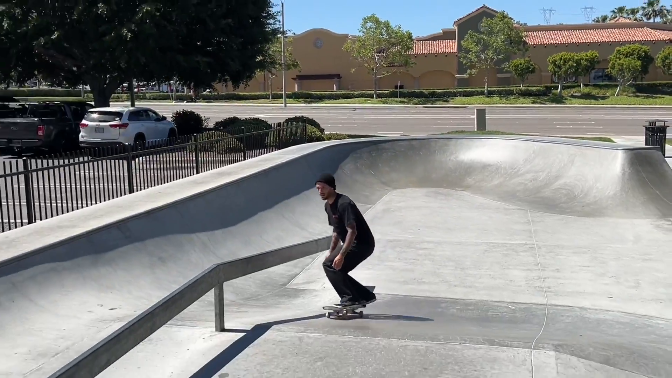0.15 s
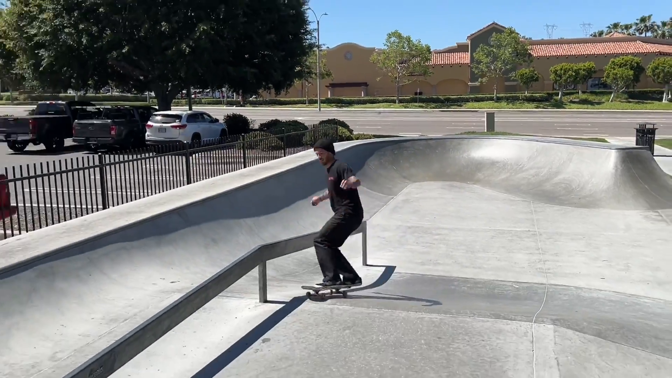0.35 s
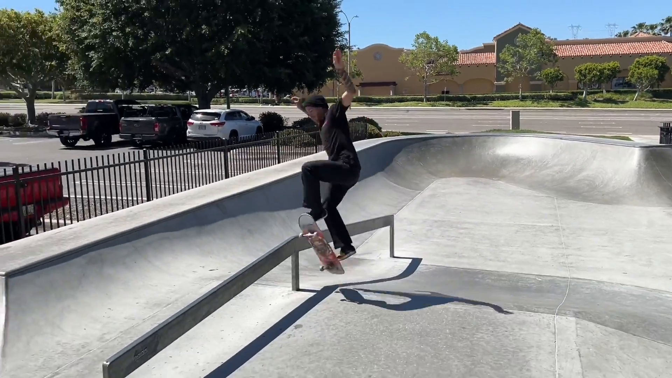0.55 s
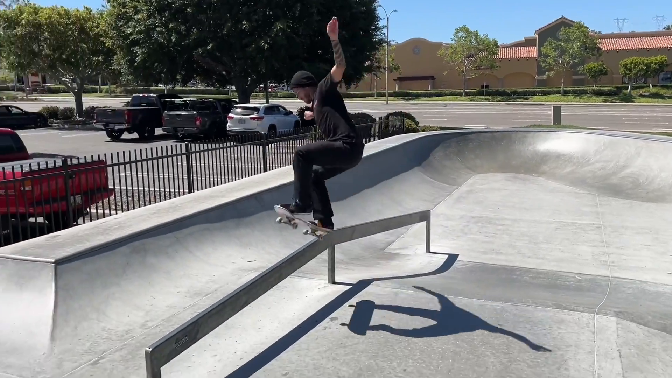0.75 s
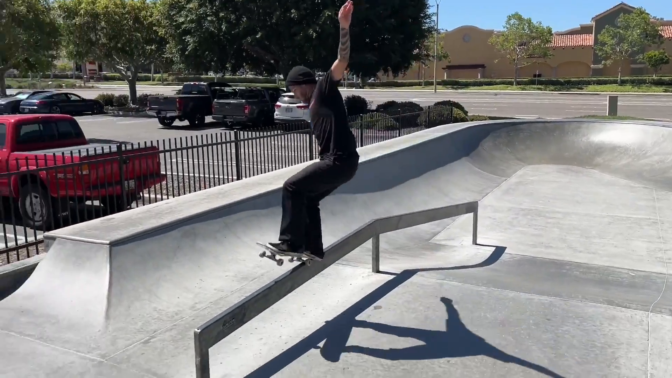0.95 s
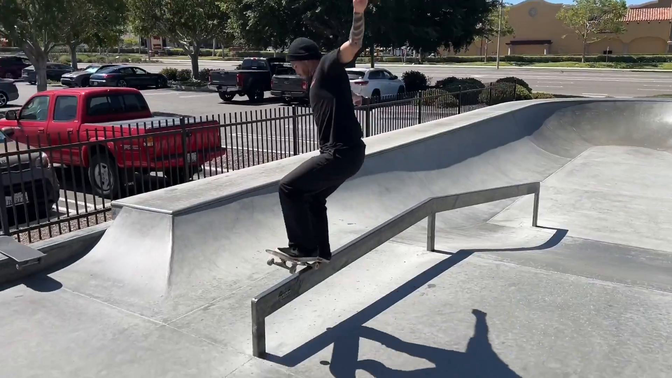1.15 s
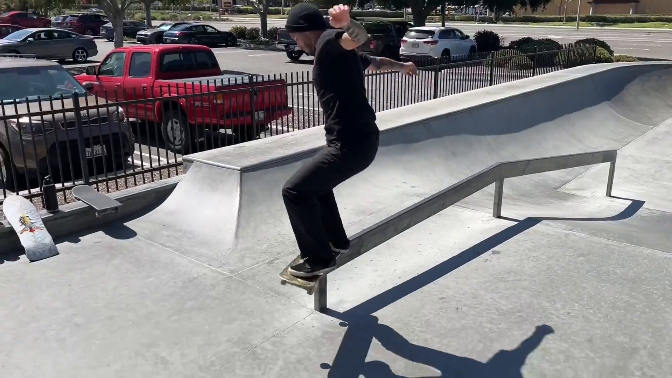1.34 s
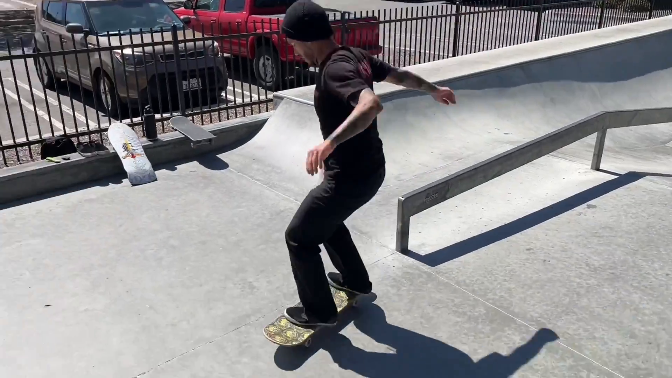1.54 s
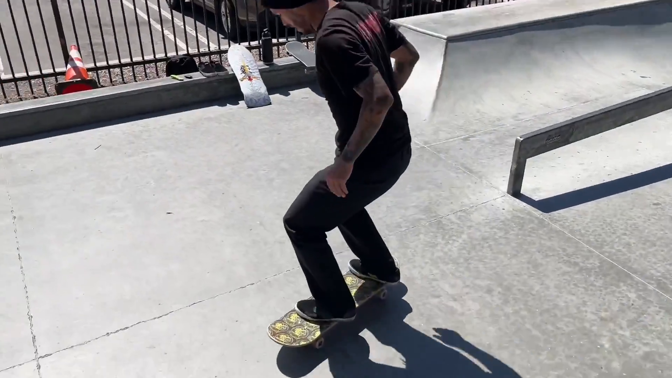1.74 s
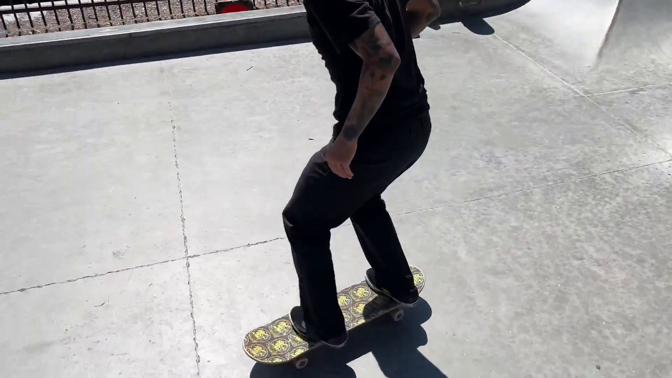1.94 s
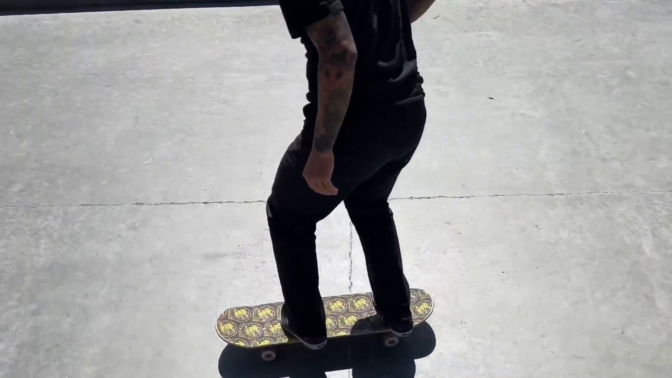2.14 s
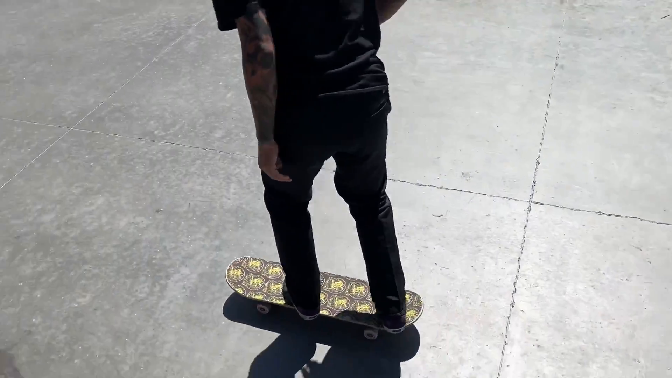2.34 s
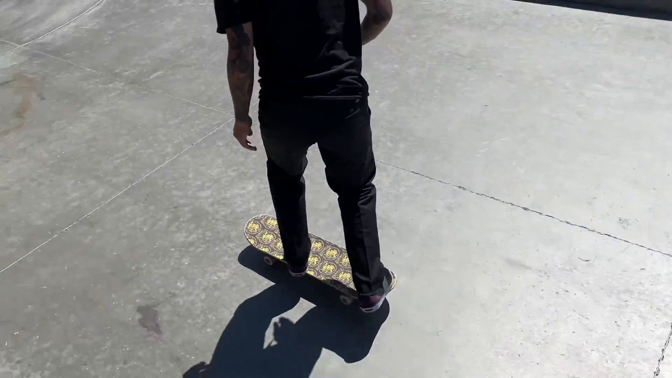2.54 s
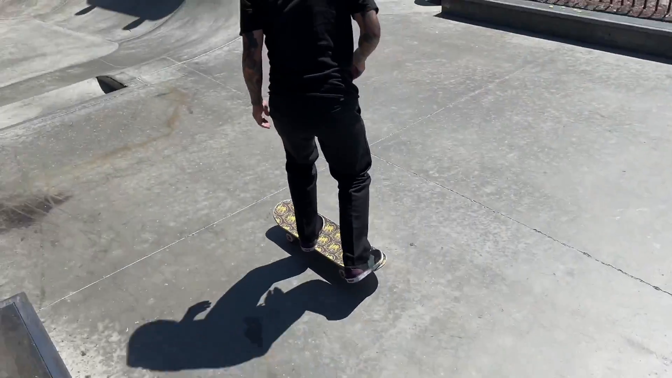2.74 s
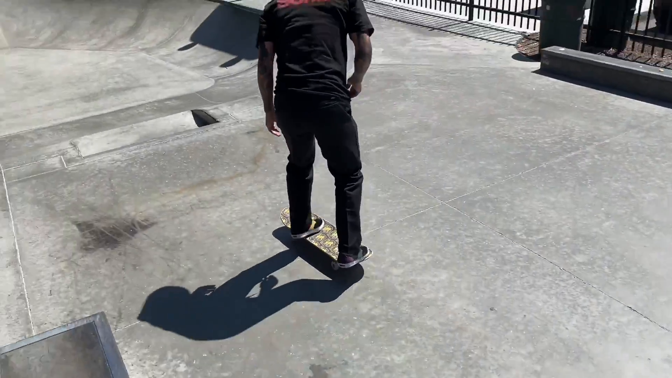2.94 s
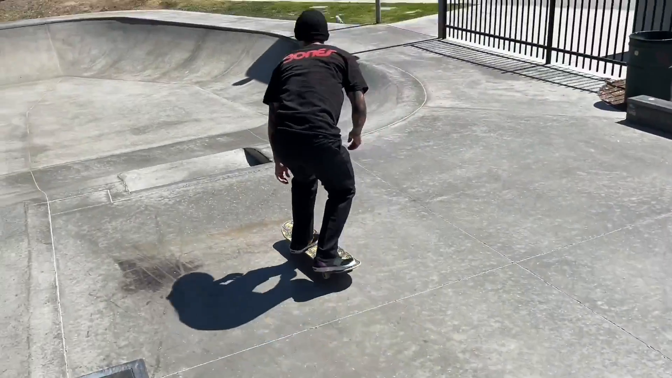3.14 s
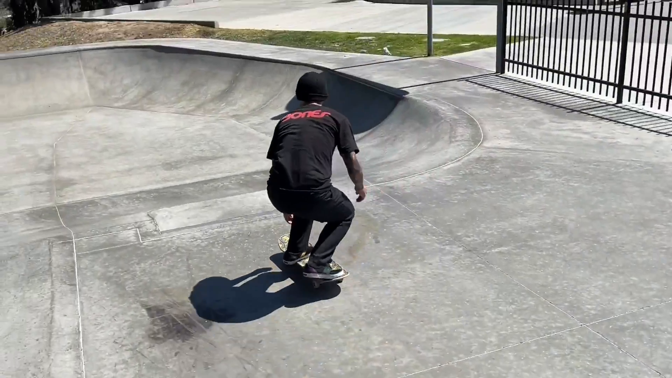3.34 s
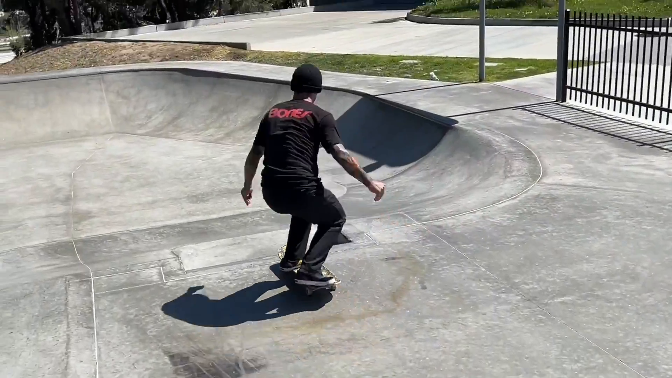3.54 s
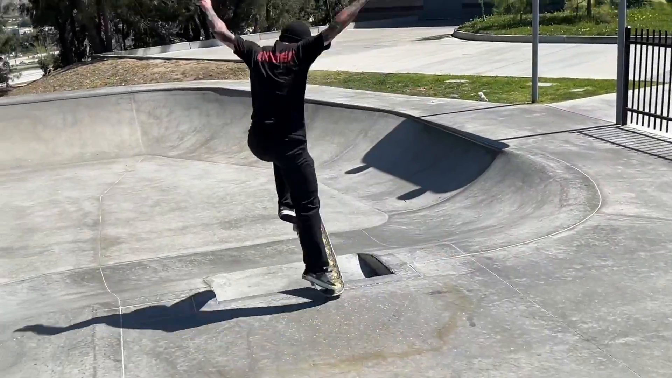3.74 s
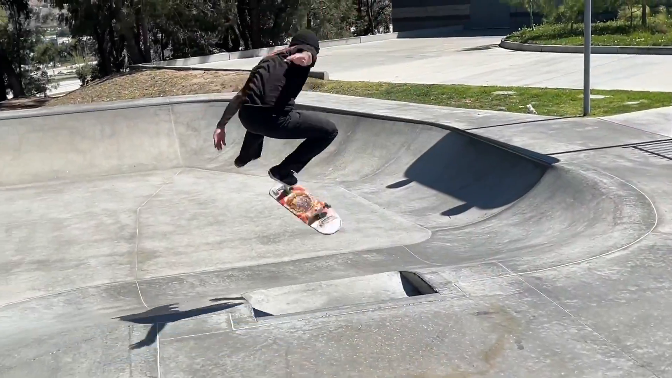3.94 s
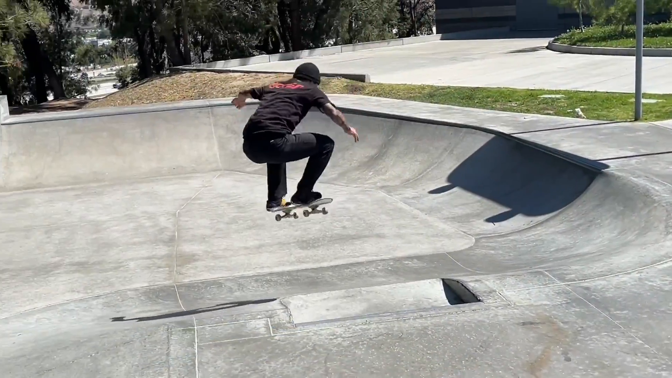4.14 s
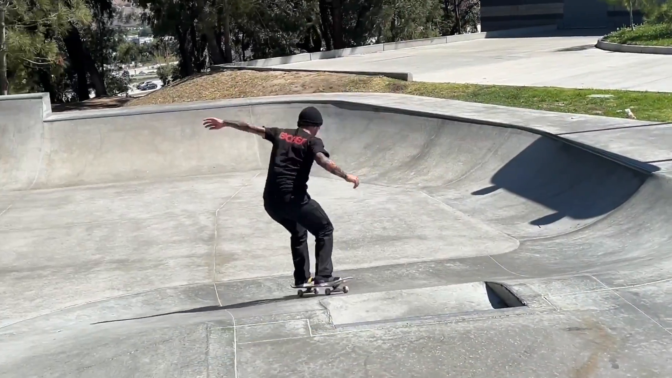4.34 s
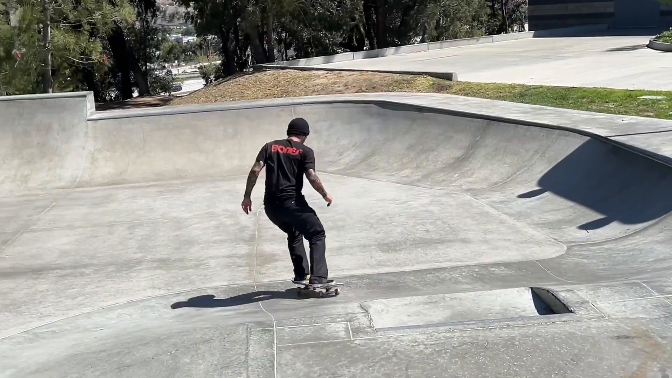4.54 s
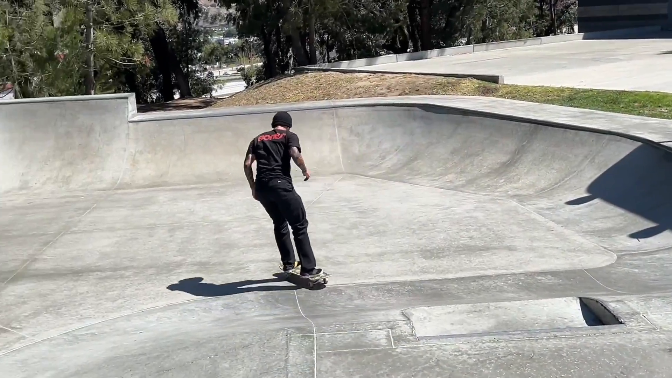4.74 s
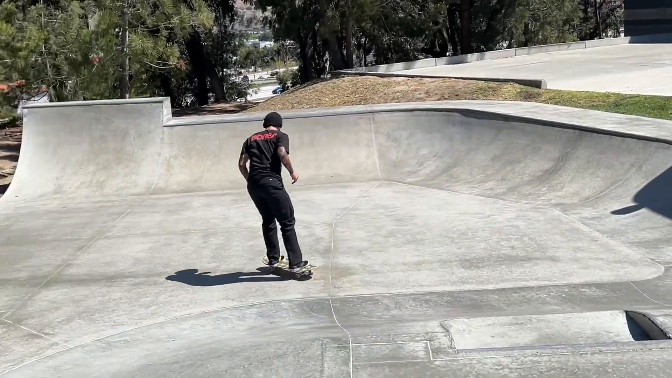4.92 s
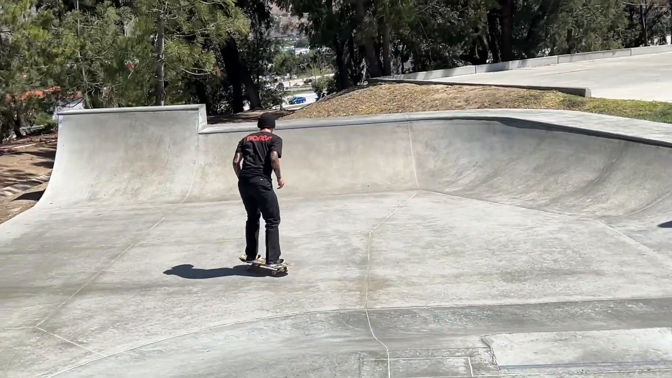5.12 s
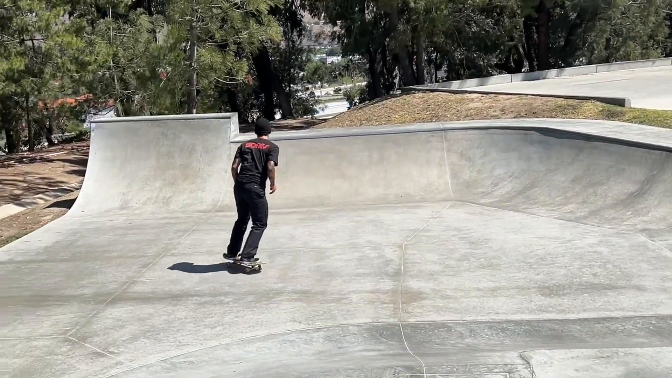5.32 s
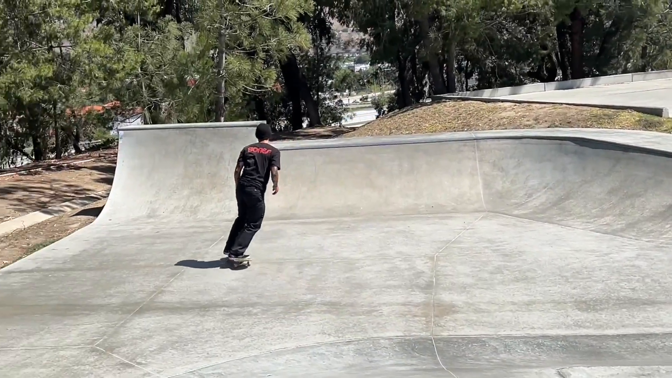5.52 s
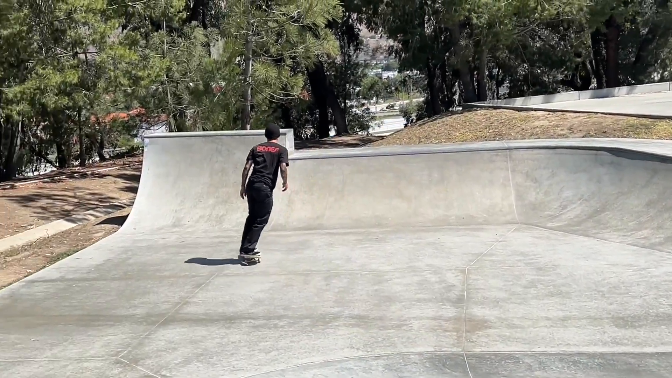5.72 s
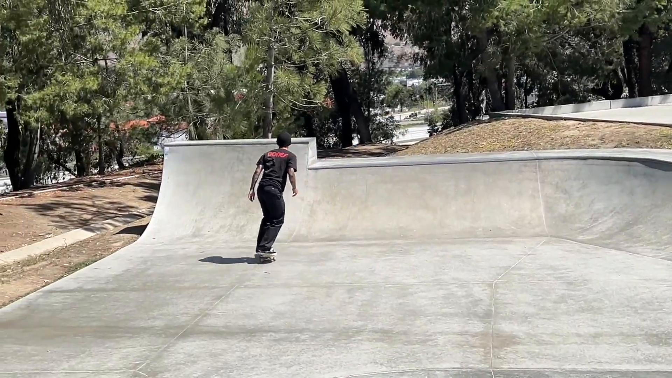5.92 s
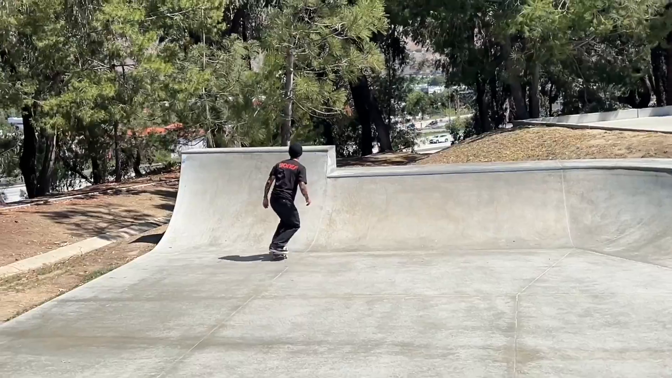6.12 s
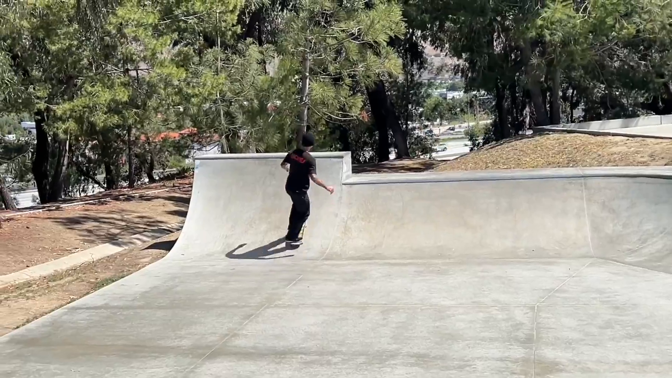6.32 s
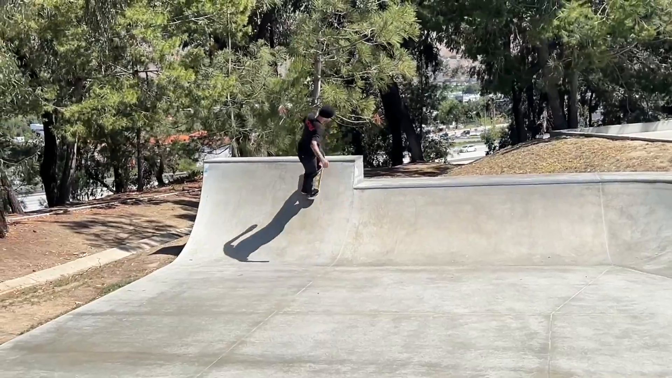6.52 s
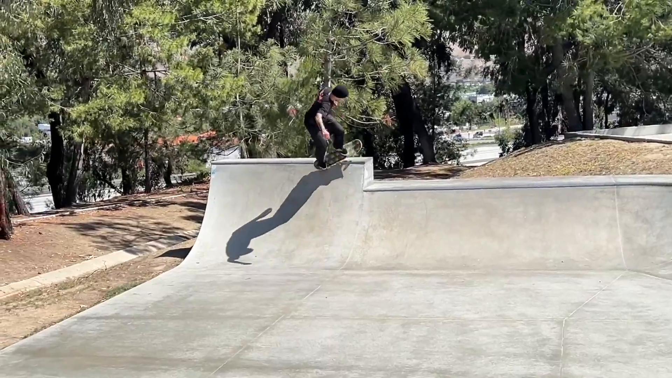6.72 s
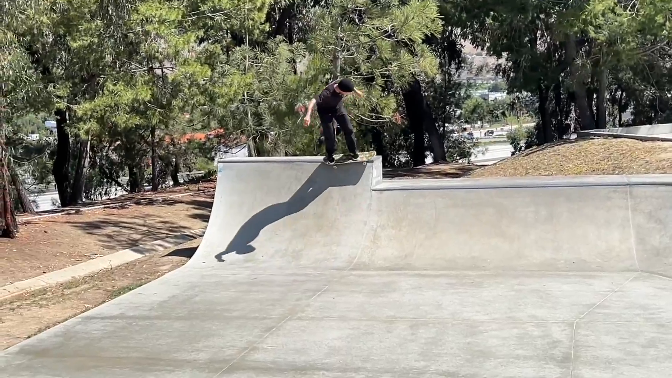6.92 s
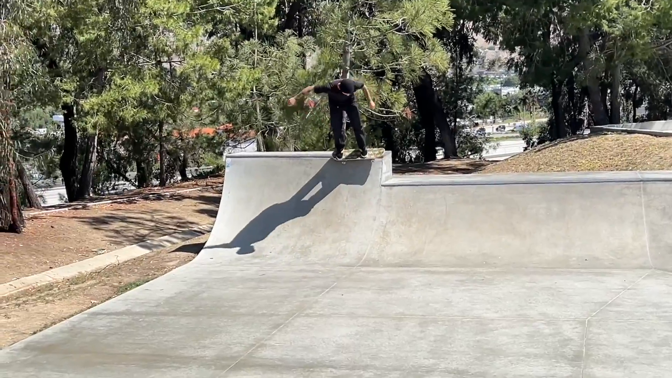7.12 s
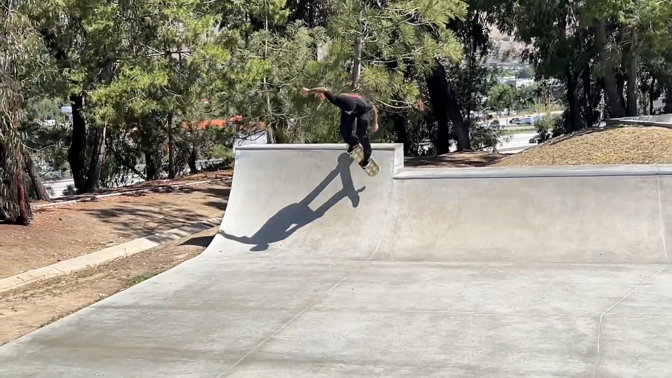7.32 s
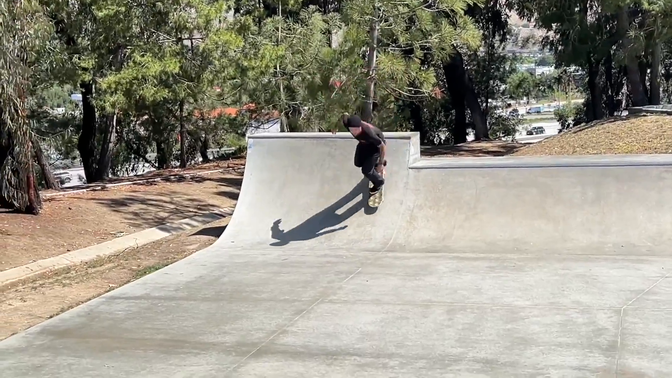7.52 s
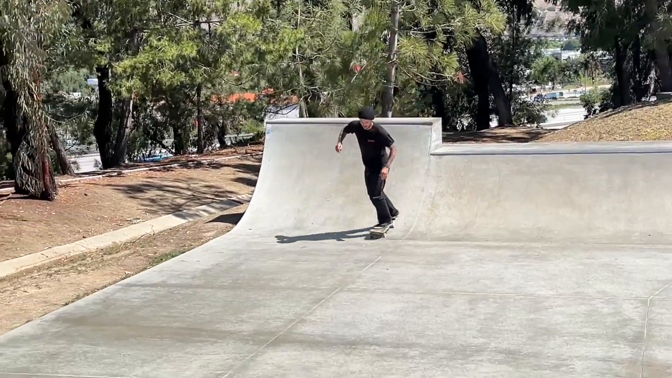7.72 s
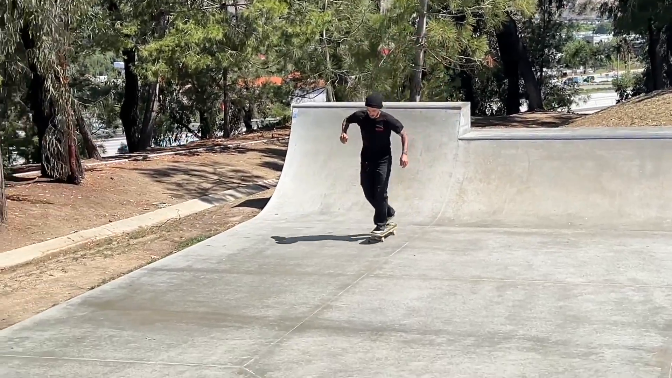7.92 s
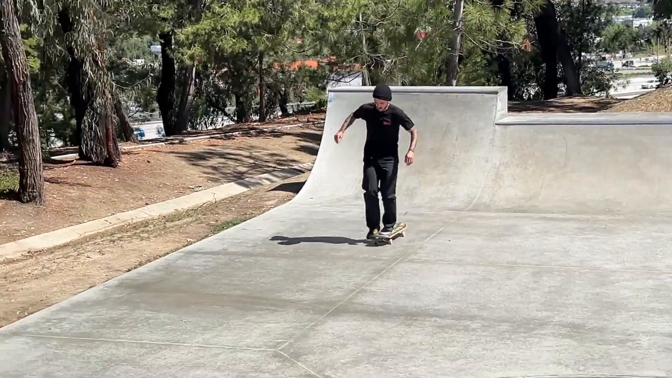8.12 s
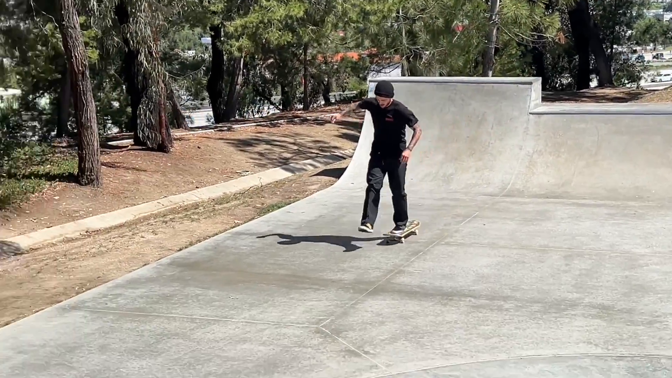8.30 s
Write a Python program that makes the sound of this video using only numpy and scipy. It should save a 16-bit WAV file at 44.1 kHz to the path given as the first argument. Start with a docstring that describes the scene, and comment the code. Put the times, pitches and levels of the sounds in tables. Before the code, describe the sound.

Outdoors in a concrete skatepark, wind rumbles and flutters on a handheld stereo microphone above a faint road hum and soft wheel roll. At 0.5 seconds a board's tail cracks loudly; near 0.9 it strikes a steel rail with a double clack, a brief bright scrape and ringing metal, then a light grind until 1.4. Hard woody landing slaps come at 1.35 to 1.5. Wheels roll close, with a deck hum, tiny metallic ticks and a low knock around 2.1 amid strong wind bursts. The wind eases as the rolling moves ahead. A low thump at 3.6 precedes a sharp pop at 3.75; airborne quiet ends in a dense clattering landing at 4.3. Smooth, gritty rolling continues. Around 6.2 faint ticks, then scattered knocks at 6.7 to 6.95 on a ramp lip, gusts near 7.1, a clustered clack at 7.5, small taps at 7.8 to 7.9, and rolling to the end at about 8.4.

```python
"""A skateboarder pops onto a steel rail, slides, lands, flips the board and grinds a ramp lip in a concrete park.
Blows on the board are short noisy contacts that crack, ring the deck modes and rattle; on the rail, a hail
of slips drives the modes of the tube. Wheels roll over the hum of a far road, both shaped noise.
Gusts buffet the microphone of a hand-held camera: rumble and flutter noise with single sagging eddies."""
import sys
import numpy as np
from scipy import signal
from scipy.fft import rfft, irfft, next_fast_len
from scipy.io import wavfile
from scipy.ndimage import uniform_filter1d

SR = 44100
rng = np.random.default_rng(int(sys.argv[2]) if len(sys.argv) > 2 else 0)


def pcm_store(signal):
    """Save signal as 16-bit PCM."""
    levels = np.round(np.clip(np.atleast_2d(signal), -1, 1) * 32767)
    wavfile.write(sys.argv[1], SR, levels.astype(np.int16).T)


N = 368673
T = np.arange(N) / SR

# Gusts on the microphone. Each row: peak time in seconds, rumble level in dB, flutter level in dB,
# build-up in seconds, collapse in seconds.
GUSTS = [(.07, -23, -28, .3, .12), (.24, -24, -24, .12, .2), (.35, -22, -33, .2, .04),
         (.49, -22, -24, .06, .08), (.9, -28, -30, .35, .4), (1.12, -28, -30, .15, .2),
         (1.3, -22, -25, .25, .3), (1.38, -23, -23, .12, .1), (1.48, -20, -21, .14, .12),
         (1.71, -24, -26, .2, .2), (2.12, -20, -24, .5, .17), (2.22, -27, -25, .05, .05),
         (2.6, -43, -46, .6, .6), (2.82, -32, -42, .12, .1), (3.1, -36, -48, .3, .07),
         (3.62, -43, -43, .3, .3), (3.95, -32, -36, .1, .25), (4.27, -28, -32, .2, .07),
         (4.47, -35, -35, .1, .3), (4.8, -42, -41, 1.2, 1.2), (5.08, -33, -34.5, .15, .12),
         (5.4, -36, -41, .3, .3), (5.72, -34, -39, .6, 1.2), (6.26, -36, -34, .3, .12),
         (6.33, -28, -36, .06, .09), (6.48, -33, -31, .15, .06), (6.62, -38, -38, .1, .25),
         (7.07, -25, -32, .07, .4), (7.25, -27, -34, .3, .15), (7.38, -29, -36, .1, .08),
         (7.57, -32, -41, .15, .1), (8.1, -40.5, -41, 1.5, 1.5)]


def gain_of(db):
    """Amplitude factor of a level in dB."""
    return 10 ** (np.asarray(db) / 20)


def evened(x):
    """Scale to an RMS of one."""
    return x / np.sqrt(np.mean(x ** 2) + 1e-20)


def peaked(x):
    """Scale to a peak of one."""
    return x / abs(x).max()


def smoothed_noise(count, size):
    """Slow random wander of unit RMS: white noise averaged over size steps."""
    return evened(uniform_filter1d(rng.standard_normal(count), size=size))


def filtered(x, order, edge_hz, kind="low"):
    """Butterworth filter."""
    return signal.sosfilt(signal.butter(order, edge_hz, kind, fs=SR, output="sos"), x)


def read(points, hz):
    """Read a curve over pitch, with straight lines on a log-frequency axis."""
    f, value = np.transpose(points)
    return np.interp(np.log(hz + 1), np.log(f + 1), value)


def add(mix, s, sound):
    """Mix a sound in at s seconds, cut off at the end."""
    part = mix[..., round(s * SR):][..., :sound.shape[-1]]
    part += sound[..., :part.shape[-1]]


def ring(x, hz, t60):
    """A mode: one decaying sine for every push in x."""
    r, w = 10 ** (-3 / (t60 * SR)), 2 * np.pi * hz / SR
    return signal.lfilter([np.sin(w)], [1, -2 * r * np.cos(w), r * r], x)


def noise(colour, same, patchy_db, flicker_db, size, level_db, band, tilt_db=0):
    """Two-channel noise from random short-time spectra; level_db sets the band, tilt_db brightens per octave."""
    hop, bins = size // 4, size // 2 + 1
    frames, hz = N // hop + 5, np.fft.rfftfreq(size, 1 / SR)
    a, b, c, d, patches = rng.standard_normal((frames, bins, 5)).T
    # patches drift over time and pitch; flicker moves all pitches together
    patches = uniform_filter1d(patches, size=4, axis=0)
    patches = evened(uniform_filter1d(patches, size=8, axis=1))
    flicker = smoothed_noise(frames, 2)
    left = a + 1j * b
    right = same * left + np.sqrt(1 - same ** 2) * (c + 1j * d)
    octaves = np.log2(np.clip(hz / 1000, .5, 3))[:, None]
    tilt = octaves * np.interp(np.arange(frames) * hop / SR, T, tilt_db + 0 * T)
    spectrum_db = read(colour, hz)[:, None] + tilt + patchy_db * patches + flicker_db * flicker
    spectra = np.array([left, right]) * gain_of(spectrum_db)
    x = signal.istft(spectra, nperseg=size, noverlap=size - hop)[1][:, :N]
    inside = filtered(x.mean(0), 3, band, "band")
    return x / np.std(inside) * gain_of(level_db)


def gusting(peaks_db, calm_db, steepness):
    """Level over time: the strongest gust of the moment, or the calm breeze."""
    swell_db = 12  # change over one build-up or collapse time at steepness 1
    at, _, _, build, collapse = np.transpose(GUSTS)[..., None]
    away = np.maximum((at - T) / np.maximum(build, .01), (T - at) / np.maximum(collapse, .01))
    return np.maximum((peaks_db[:, None] - steepness * swell_db * away).max(0), calm_db)


def eddies():
    """Single eddies bursting on the ports: short swells of a sine whose pitch sags."""
    # Each row: start in seconds, peak level in dB, pitch it sags to in Hz.
    bursts = [(0.015, -16.5, 312), (0.475, -18, 159), (0.485, -14, 240), (1.21, -12, 237),
              (1.318, -13, 240), (1.385, -11.5, 328), (1.699, -11, 210), (1.919, -15, 152),
              (1.997, -13, 300), (2.091, -9, 373), (2.109, -12, 420), (2.124, -9, 300), (2.13, -11, 160),
              (2.148, -11, 220), (2.226, -18, 380), (2.238, -14, 260), (2.297, -23, 300),
              (2.838, -12.5, 150), (3.962, -20, 253), (4.262, -18, 234), (6.325, -18.5, 153),
              (6.488, -19.5, 234), (7.131, -13, 250), (7.19, -18, 250), (7.227, -14, 230),
              (7.263, -18, 154), (7.366, -22, 197)]
    drop, turns = 1.6, .6  # starts this share above its pitch; cycles of that pitch up to the peak
    out, t = np.zeros((2, N)), np.arange(2400) / SR
    for (at, db, hz), (turn, side) in zip(bursts, rng.random((len(bursts), 2))):
        u = t * hz / turns
        cycles = hz * t + drop * turns * (1 - np.exp(-u)) + turn
        burst = np.e * u * np.exp(-u) * np.sin(2 * np.pi * cycles)
        lean_db = 4.0 * (side - .5)  # random lean to one side
        add(out, at, gain_of(db) * burst * gain_of([[lean_db], [-lean_db]]))
    return out


def wind():
    """Lumpy pressure on the ports: a rumble, a quicker flutter and single eddies on top."""
    # Spectra of rumble and flutter. Each row: frequency in Hz, relative level in dB per Hz.
    rumble_colour = [(25, -28), (42, -15), (62, 5.5), (100, -0.5), (180, -4.5), (300, -21), (600, -55),
                     (2000, -110)]
    flutter_colour = [(120, -13.5), (220, 0), (400, -2), (650, -12), (1300, -26), (2500, -55), (6000, -100)]
    _, rumble_db, flutter_db, _, _ = np.transpose(GUSTS)
    # the breeze between gusts: -45.5 dB of rumble, -50 dB of flutter
    rumble_level = gusting(rumble_db, -45.5, steepness=1)
    flutter_level = gusting(flutter_db, -50, steepness=1.3)
    rumble = noise(rumble_colour, 0.82, patchy_db=1.5, flicker_db=1.5, size=2048,
                   level_db=rumble_level, band=(50, 200))
    flutter = noise(flutter_colour, 0.8, patchy_db=1.5, flicker_db=4.5, size=256,
                    level_db=flutter_level, band=(200, 550))
    return (rumble + flutter + eddies()) * gain_of([[.3], [-.3]])  # slightly louder on the left


def roll():
    """Urethane on smooth concrete and the far road hum near 850 Hz; grit hisses above; close by, the deck sings."""
    # Wheels and road. Each row: time in seconds, hum level in dB, gritty hiss level in dB before its grain.
    levels = [(0, -41, -50), (.84, -40, -54), (1.07, -32, -47), (1.48, -35, -49), (1.57, -48, -59),
              (1.7, -40, -56), (1.98, -36.5, -49.5), (2.55, -43, -55.5), (2.95, -42.5, -54),
              (3.55, -43.5, -61), (3.74, -42, -60), (3.78, -40, -47), (3.86, -41, -50), (3.88, -41, -55),
              (4.1, -39, -61), (4.15, -39, -56), (4.24, -38, -61), (4.31, -38, -58), (4.38, -36, -46),
              (4.5, -37.5, -52.5), (4.9, -40, -57), (5.5, -38, -56), (5.94, -38.5, -60), (6.38, -37.5, -51),
              (6.6, -40.5, -56), (6.7, -36, -51), (6.87, -36.5, -52), (7.1, -38, -62), (7.45, -38, -60),
              (7.7, -37.5, -50.5), (8.0, -39.5, -57), (8.36, -38.5, -57.5)]
    # Spectra of hum and hiss. Each row: frequency in Hz, relative level in dB per Hz.
    hum_colour = [(250, -33.5), (400, -11.5), (620, -9), (850, -5), (1100, -7.5), (1400, -10.5),
                  (1700, -14), (2050, -14), (2600, -22), (4000, -32), (8000, -77)]
    hiss_colour = [(1500, -38), (2800, 2.5), (3900, 1.5), (6000, -2), (8600, -8.5), (10200, -33.5),
                   (11600, -6), (16500, -40)]
    # Stereo width. Each row: frequency in Hz, left-right likeness (1 is mono).
    likeness = [(300, 0.5), (900, 0.46), (1400, 0.19), (2100, 0.81), (3000, 0.89), (7000, 1), (12000, 0.27)]
    # The hum is brighter with the wheels close by. Each row: time in seconds, tilt in dB per octave.
    brightness = [(.3, -1), (2.4, 1.5), (3.6, 2.5), (5.2, .5)]
    # The deck singing as the wheels roll close by. Each row: time in seconds, level in dB.
    singing = [(1.56, -70), (1.75, -46), (2.05, -42), (2.4, -46), (2.6, -62)]

    same = np.clip(read(likeness, np.fft.rfftfreq(512, 1 / SR)), -1, 1)[:, None]
    s, hum_db, hiss_db = np.transpose(levels)
    hum = noise(hum_colour, same, patchy_db=1.5, flicker_db=0.42, size=512,
                level_db=np.interp(T, s, hum_db), band=(800, 2500),
                tilt_db=np.interp(T, *np.transpose(brightness)))
    hiss = noise(hiss_colour, same, patchy_db=1.6, flicker_db=1.8, size=512,
                 level_db=np.interp(T, s, hiss_db), band=(3500, 9000))
    grains = gain_of(2.5 * smoothed_noise(N, 40))  # grit under the wheels makes the hiss grainy
    sing_s, sing_db = np.transpose(singing)
    sing = evened(ring(rng.standard_normal(N), hz=1310, t60=.012))
    sing *= gain_of(np.interp(T, sing_s, sing_db, -99, -99))
    return hum + sing + grains * hiss


def park(colour_db, t):
    """What follows a blow: rattling trucks and the scattered echoes of walls and ramps, in clumps."""
    left, right = rng.standard_normal((2, len(t)))
    clumps = gain_of(3.5 * smoothed_noise(len(t), 300))
    shake = np.array([left, .9 * left + .4 * right]) * clumps
    decay = gain_of(-60 * t / .33)  # 60 dB in .33 s
    fade = decay * (1 - np.exp(-t / .006)) * np.cos(np.pi / 2 * t / t[-1])
    return evened(irfft(rfft(shake) * gain_of(colour_db), len(t))) * fade


def board():
    """Each blow is a short chatter of contact that cracks, rings and bends the deck."""
    # Each row: time in seconds, peak of ring and crack in dB, strongest ring in Hz, crack over ring in dB,
    # centre of the crack in Hz, hardness in dB per octave, thump in dB, deep thump in dB (both under the blow).
    blows = [(0.523, -1.5, 1340, 4, 2300, 2.5, -21, -18), (0.872, -4.5, 1400, 8.5, 2900, 2.5, -19, -25),
             (0.896, -1, 900, -1, 5000, 3, -15, -22), (1.104, -19, 1300, -6, 1900, -4, -18, -25),
             (1.221, -19, 2010, -6, 2200, 0, -14, -20), (1.35, -9.5, 1340, -11, 2450, 0, -10, -20),
             (1.4205, 1, 2250, 0, 2400, -7, -26, -32), (1.5045, 0, 1030, -3, 2200, 2, -16, -26),
             (1.518, -15, 1100, -4, 2450, 0, -8, -18), (1.531, -10, 1200, -3, 2450, -2, -18, -25),
             (2.087, -9, 1300, -9, 2000, 6, -8, -15), (2.109, -14, 720, -14, 1800, -4, -5, -12),
             (2.249, -22.5, 1300, -9, 2200, 5, -12, -20), (2.418, -21.5, 1270, -2, 2100, -1, -10, -15),
             (2.912, -25, 1000, -8, 2450, 0, -12, -20), (3.635, -21, 1060, 0, 1950, -2, -10, -1),
             (3.659, -20.5, 1900, -10, 2000, 3, -16, -14), (3.75, -2.5, 1340, 7, 3400, 4, -14, -28),
             (3.762, -22, 1340, -4, 4300, 2, -6, 3), (4.116, -25, 1180, 14, 3200, -5, -16, -30),
             (4.174, -22.5, 2060, 4, 2800, -9, -16, -30), (4.307, -1, 1050, -5.5, 2450, 6, -14, -34),
             (4.311, -2, 1460, -3, 2450, 3, -16, -34), (4.318, -11, 1100, -1, 2600, 3, -3, -20),
             (4.326, 0, 1200, -3, 2800, 2, -9, -28), (4.338, -14, 1340, 2, 2450, 6, -10, -20),
             (6.181, -24.5, 1040, -2, 2450, 0, -12, -20), (6.262, -22, 1020, -10, 2450, 4, -8, -20),
             (6.705, -24, 2000, -6, 2000, -2, -15, -25), (6.741, -16, 1150, -9, 5500, 2, -21, -25),
             (6.79, -19, 870, -11, 1800, 0, -10, -20), (6.806, -12, 900, -1, 2000, 1, -18, -25),
             (6.842, -24, 2000, 6, 3000, 0, -20, -25), (6.8505, -14.5, 870, -2, 1900, -1, -18, -25),
             (6.854, -18, 1900, -3, 2000, 0, -16, -25), (6.859, -13, 850, -1, 2200, 1, -16, -25),
             (6.911, -8, 950, -1, 2100, 3, -7, -22), (6.95, -27, 900, 3, 2900, 0, -12, -20),
             (7.482, -12, 894, -1, 3800, 4.5, -14, -22), (7.492, -13.5, 970, -2, 4200, 5, -10, -20),
             (7.486, -17, 1460, -2, 1900, 3, -10, -20), (7.498, -17, 1200, -2, 1900, 3, -10, -20),
             (7.51, -15.5, 1200, 1, 2000, 1, -10, -20), (7.821, -23.5, 870, -3, 1500, 2, -6, -20),
             (7.891, -21, 1500, -1, 1800, 3, -12, -20), (7.91, -26, 1200, -4, 2000, 0, -14, -22)]
    # The deck and its trucks. Each row: frequency in Hz, level in dB before the ring boost, t60 in seconds.
    deck = [(890, -5, .018), (1009, -1, 0.019), (1200, -2, 0.017), (1345, -2, 0.022), (1463, -1, .018),
            (1900, -3, .018), (2050, -2, 0.016), (2280, -2, 0.011)]
    # Spectrum of the crack. Each row: frequency in Hz, relative level in dB per Hz.
    crack_colour = [(300, -80), (1000, -10), (1400, -8), (1650, -17), (1950, -7), (2500, -6), (5000, -12),
                    (9000, -24.5), (16000, -40)]
    # The whole deck bending, thump then deep thump. Each row: frequency in Hz, t60 in seconds.
    flex = [(450, 0.06), (240, 0.075)]
    contact_s, shorter_s_per_db = .0022, .00003  # contact rise at 0 dB; light blows touch more briefly
    detune = .025  # each mode is detuned at random by up to this share, anew for every blow
    rattle_db, rattle_dull_db = -30.5, -2  # rattle and echo under the blow; duller than the crack, per octave

    out, t = np.zeros((2, N)), np.arange(12000) / SR
    hz = np.fft.rfftfreq(len(t), 1 / SR) + 50
    for at, db, ring_hz, crack_db, crack_hz, hard_db, *thumps_db in blows:
        u = t / max(contact_s + shorter_s_per_db * db, .0004)
        push = rng.standard_normal(len(t)) * u * np.exp(-u)

        colour_db = read(crack_colour, hz) + hard_db * np.log2(np.maximum(hz, 1800) / 2500)
        bump_db = 9.0 * np.exp(-(np.log2(hz / crack_hz) / .5) ** 2)
        snap = push * np.exp(-.6 * u)  # the crack is over sooner than the contact
        crack = irfft(rfft(snap) * gain_of(colour_db + bump_db), len(t))
        crack *= np.cos(np.pi / 2 * t / t[-1]) ** 2

        modes = np.zeros(len(t))
        for (f, level, t60), tune in zip(deck, 1 + detune * rng.uniform(-1, 1, len(deck))):
            boost_db = 15.0 * np.exp(-(np.log2(f / ring_hz) / 0.22) ** 2)
            modes += gain_of(level + boost_db) * ring(push, f * tune, t60)

        bend = np.gradient(np.gradient(u ** 3 * np.exp(-2 * u)))  # smooth push without the chatter
        thump = sum(gain_of(level) * peaked(ring(bend, f, t60)) for (f, t60), level in zip(flex, thumps_db))

        blow = peaked(peaked(modes) + gain_of(crack_db) * peaked(crack)) + thump
        rattle = park(colour_db + rattle_dull_db * np.log2(hz / 2500), t)
        add(out, at - .0004, gain_of(db) * (blow + gain_of(rattle_db) * rattle))
    return out


def rail():
    """The deck strikes the tube; then stick and slip, a hail of uneven clicks, crackles and keeps the steel ringing."""
    # The steel tube, damped by the deck on it. Each row: frequency in Hz, relative level in dB, t60 in seconds.
    tube_modes = [(921, -6, .12), (1400, -5, .1), (1943, -1, .2), (2530, -7, .12), (2681, 3, .19),
                  (3004, -1, .15), (3182, -7, .1), (3370, -3, .17), (3763, -3, .13), (4134, -1, .13),
                  (4212, -4, .1), (4285, -6, .1), (4414, -1, .13), (4765, -8, .09), (5682, -9, .09),
                  (6471, -13, .08)]
    # the deck bites, the bite fades into a lighter grind, then it drops off
    on_s, bite_s, off_s = .885, .03, 1.4  # touch, length of the bite's rise, drop-off
    bite_db, bite_fade_db_per_s = -17, 160
    grind_db, grind_dull_hz = -38.98, 3800  # the light grind is duller than the bite
    catch_db, catch_s = 3, .03  # the grind catches and lets go: depth, length
    strike_db, strike_s = 20, .024  # first strike over one slip; the tube takes the weight this late
    tube_db = 4  # level of the ringing steel

    t = np.arange(0, off_s - on_s + .3, 1 / SR)
    slips = rng.choice([-1., 1.], len(t)) * (rng.random(len(t)) < 7000 / SR)  # about 7000 slips a second
    slips *= gain_of(2.6 * np.minimum(rng.exponential(1, len(t)), 4))
    slips *= gain_of(2.8 * smoothed_noise(len(t), 120))
    slips = evened(slips)
    catch = smoothed_noise(len(t), round(catch_s * SR))
    bite = gain_of(bite_db - bite_fade_db_per_s * np.maximum(t - bite_s, 0))
    bite *= np.minimum(t / bite_s, 1) ** 2
    light = filtered(slips * gain_of(grind_db + catch_db * catch), 2, grind_dull_hz)
    drop_off = np.clip((off_s - on_s - t) / .015, 0, 1)
    drive = (slips * bite + light) * drop_off

    scrape = 2 * filtered(drive, 2, [1900, 5200], "band")
    strike = np.arange(len(t)) == round(strike_s * SR)
    struck = drive + gain_of(bite_db + strike_db) * strike
    # long modes are scaled down so that t60 alone does not make them louder
    tube = sum(gain_of(db) * ring(struck, hz, t60) / np.sqrt(t60 * SR) for hz, db, t60 in tube_modes)
    out = np.zeros(N)
    add(out, on_s, scrape + gain_of(tube_db) * tube)
    return out


def hardware():
    """Small bright ticks of axles and nuts: a noisy push rings one high mode over its own hiss."""
    # Loose hardware ticking. Each row: time in seconds, peak level in dB.
    ticks = [(1.866, -35), (1.904, -33), (1.923, -31), (1.959, -32), (1.998, -26), (2.052, -28.5),
             (2.148, -29), (2.101, -29), (2.315, -39)]
    out, t = np.zeros(N), np.arange(900) / SR
    for (at, db), hz in zip(ticks, rng.uniform(3500, 5600, len(ticks))):
        push = rng.standard_normal(len(t)) * (t / .0012) * np.exp(-t / 0.00091)
        hiss = filtered(push, 2, [3000, 12000], "band")
        tick = evened(ring(push, hz, .008)) + 0.71 * evened(hiss)
        add(out, at - .001, gain_of(db) * peaked(tick))
    return out


def ports(x, pair):
    """The two microphone ports differ in phase and level, by pitch."""
    size = next_fast_len(N)
    hz, (f, lead, balance_db) = np.fft.rfftfreq(size, 1 / SR), np.transpose(pair)
    # half of the difference goes to each port
    half = np.exp(.5j * np.interp(hz, f, lead)) * gain_of(np.interp(hz, f, balance_db) / 2)
    return irfft(rfft(x, size) * np.array([half, 1 / half]), size)[:, :N]


def scene():
    """The skating moves from the side to ahead as the camera swings round; wind acts on the ports directly."""
    # The port pair, for sound from the side and from ahead.
    # Each row: frequency in Hz, phase by which left leads in radians, left over right in dB.
    from_aside = [(500, 1.2, -1), (1370, 0.6, 3.5), (2100, 1, -3.5), (2980, 1.63, 0.5), (4000, 1.22, 1),
                  (5400, 1.8, 3.5), (6440, 1.25, 1), (8200, 1.4, 0), (12000, 1.3, 0.5)]
    from_ahead = [(490, -0.27, 3.4), (1390, -0.04, 1.3), (2100, -0.37, -2.3), (2980, 0.65, 0),
                  (4030, 0.7, 0), (5330, 0.26, 0), (6840, 0.2, 0.18), (11900, 1, 0)]
    turn_s, turn_length_s = 2.84, 0.53  # the camera swings round behind the rider
    air = roll() + board() + rail() + hardware()
    ahead = np.clip((T - turn_s) / turn_length_s, 0, 1)
    return (1 - ahead) * ports(air, from_aside) + ahead * ports(air, from_ahead) + wind()


def record(dry):
    """The bass cut of the microphone, a soft knee on the peaks and the band limit."""
    cut = filtered(dry, 3, 48, "high")
    held = .95 * np.tanh(cut / .95)
    band_limit = signal.firwin(511, 16650, window=("kaiser", 9), fs=SR)  # low-pass edge in Hz
    return signal.oaconvolve(held, band_limit[None], "same")


dry = scene()
out = record(dry)
pcm_store(out)
```